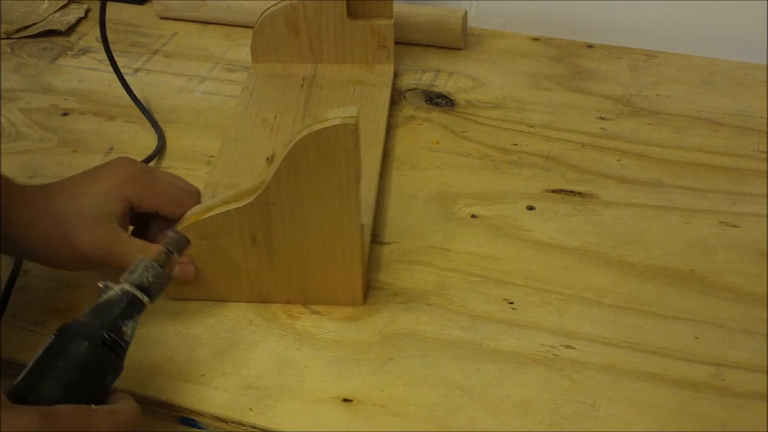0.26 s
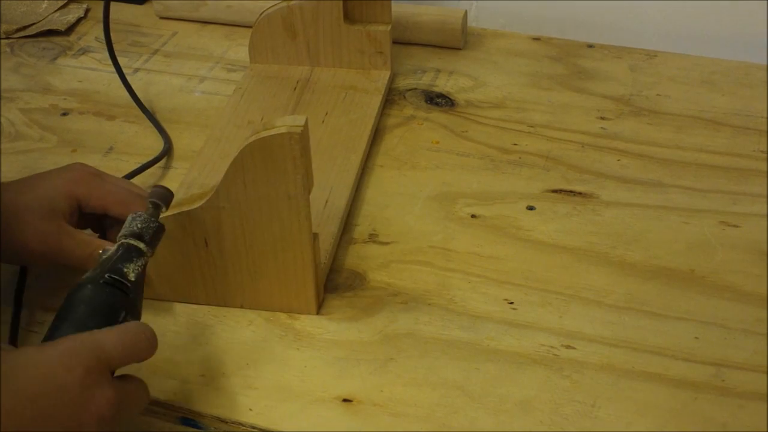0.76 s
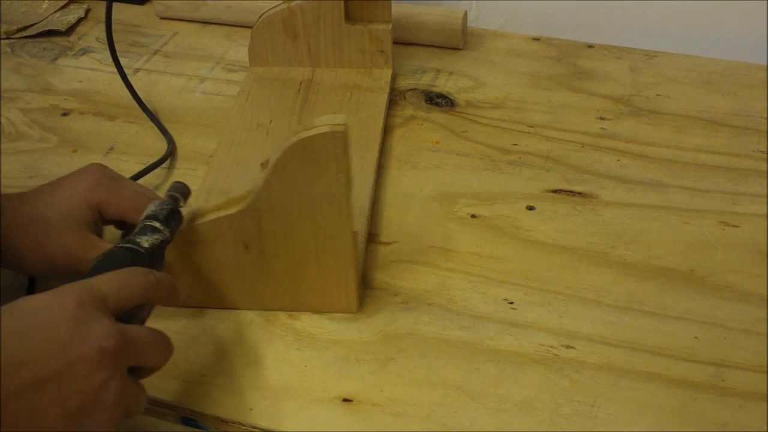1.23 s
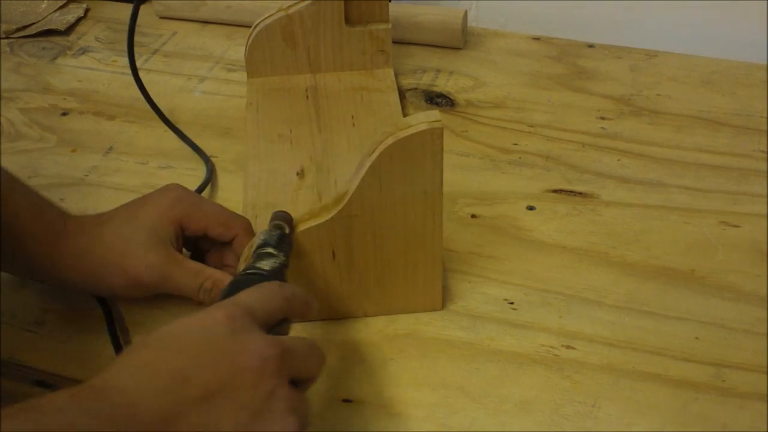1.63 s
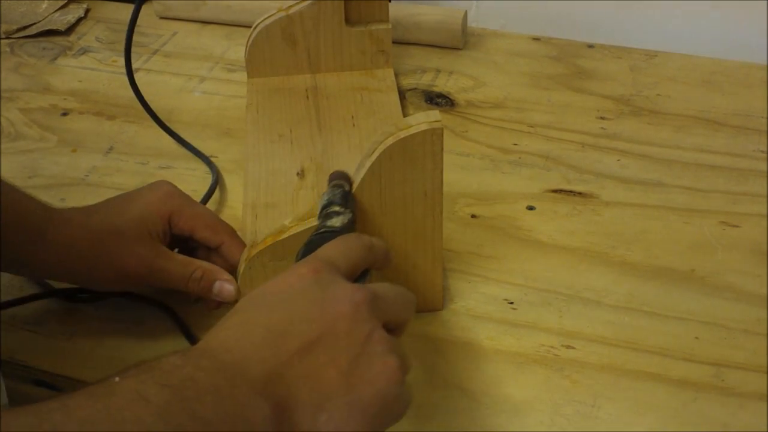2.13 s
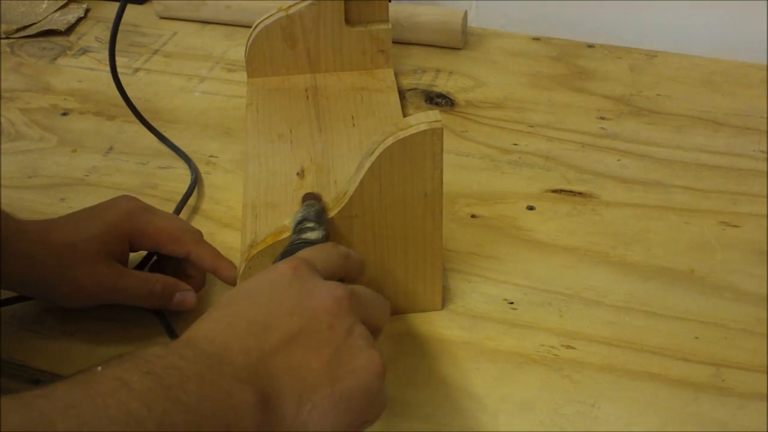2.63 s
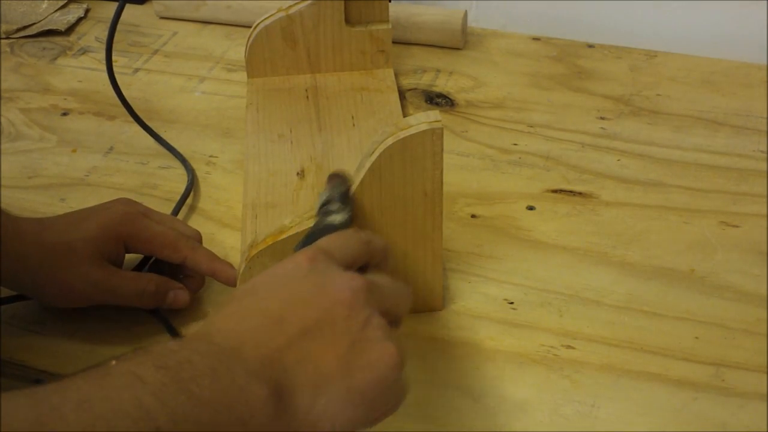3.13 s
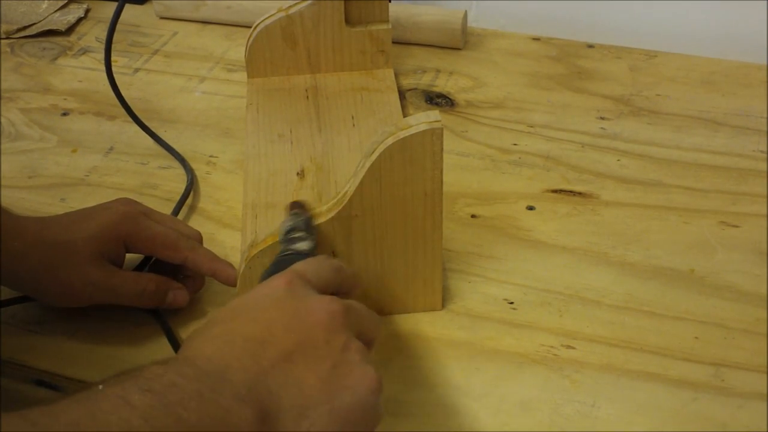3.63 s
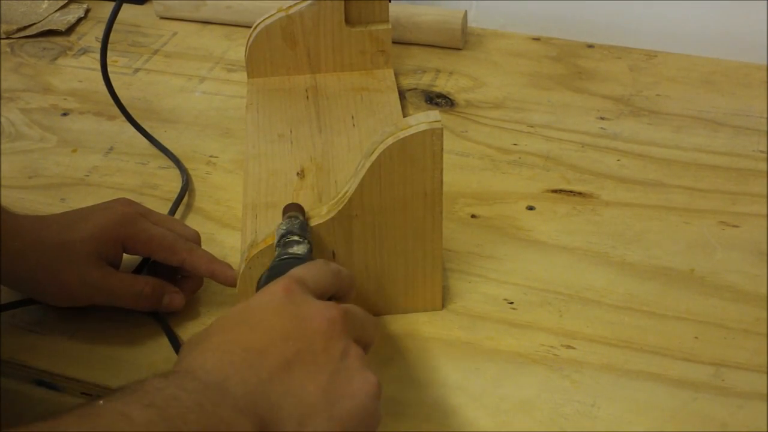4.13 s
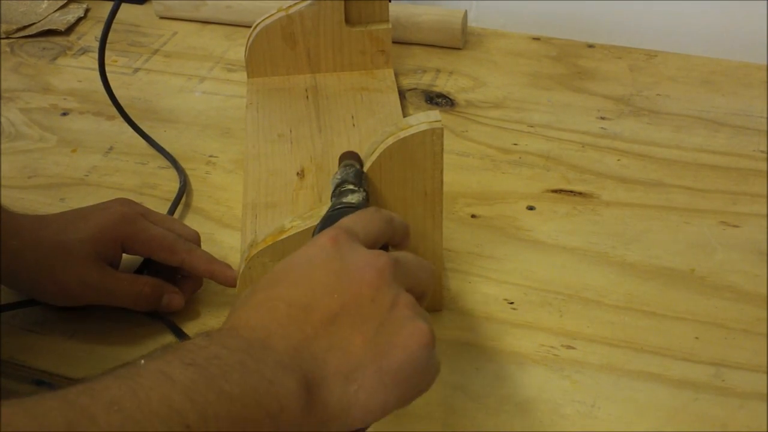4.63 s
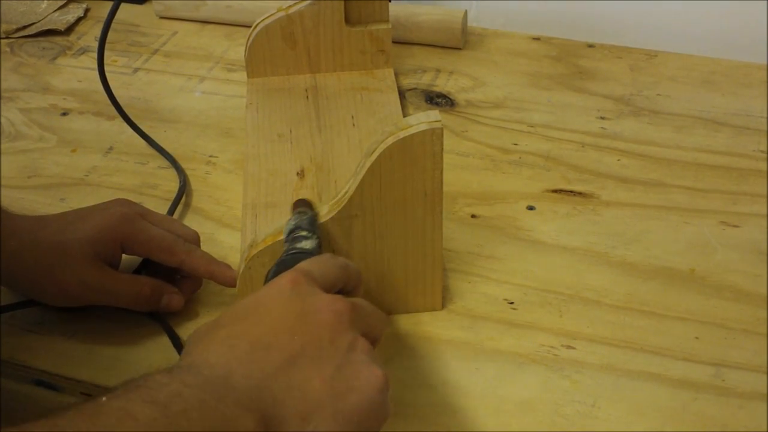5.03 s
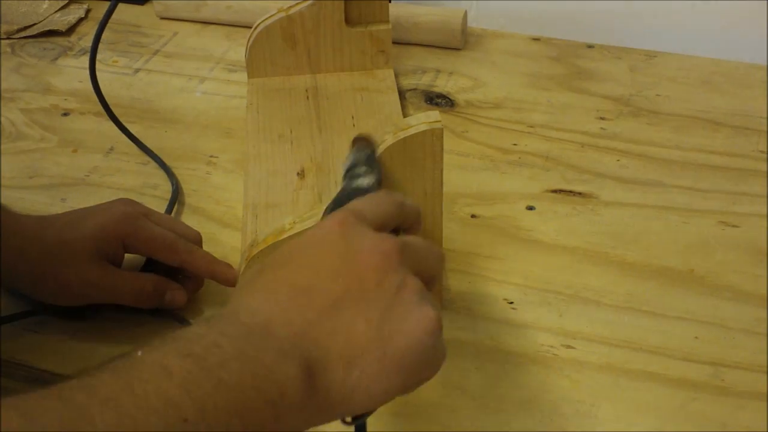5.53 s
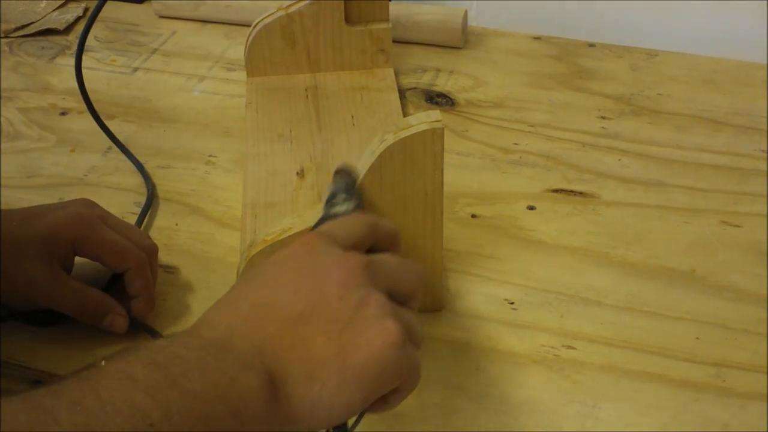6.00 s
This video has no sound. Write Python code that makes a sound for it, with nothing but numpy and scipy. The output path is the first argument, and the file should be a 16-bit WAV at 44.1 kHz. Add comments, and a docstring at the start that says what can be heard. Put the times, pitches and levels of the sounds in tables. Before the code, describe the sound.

In a quiet workshop, wood scuffs twice on a bench, then a small rotary tool whirs up and sands an edge, cutting off mid-run.

```python
"""A quiet workshop hums and a piece of wood slides twice; then a small rotary tool starts and spins up.
Its sanding drum is pressed along a wooden edge, and the sound stops abruptly with the tool still running.
Shaft, fan and ball bearings sing as sine tones at multiples of the shaft speed, which sags under load.
Rasp, cooling-air hiss, room tone and sliding are coloured noise; a sweeping growl marks the spin-up.
"""
import sys
import numpy as np
from scipy import signal
from scipy.io import wavfile
from scipy.ndimage import uniform_filter1d

SR = 44100
rng = np.random.default_rng(int(sys.argv[2]) if len(sys.argv) > 2 else 0)


def log_audio(samples):
    """Write samples as a 16-bit WAV file to the path given in sys.argv[1]."""
    # one column per channel
    frames = np.atleast_2d(samples).T
    # limit to full scale, then quantise
    limited = np.clip(frames, -1, 1)
    pcm = np.round(limited * 32767).astype(np.int16)
    wavfile.write(sys.argv[1], SR, pcm)


N = 276093
T = np.arange(N) / SR  # time of every sample [s]
ON_S = 0.685  # the tool is switched on

# Colour of the hiss from brushes and cooling air: (frequency [Hz], level [dB per Hz])
HISS_COLOUR = [(1760, -27.5), (3000, -6.5), (4660, -6.5), (7110, -8.5), (7870, -3.5), (8480, -10),
               (10000, -2), (10800, -2), (13500, -3), (15200, -3)]
# Leading tones: (multiple of shaft speed); first: ball cage, 3.08: a companion just above the third multiple,
# other fractional: bearings, last: fan blades
LEADING_MULTIPLES = (.37, 1, 2, 3, 3.08, 3.81, 4, 5, 7, 7.25, 18)


def gain_of(db):
    """Turn decibels into an amplitude factor."""
    return 10 ** (np.asarray(db) / 20)


def evened(x):
    """Scale a signal to an rms (average strength) of 1."""
    return x / np.sqrt(np.mean(x ** 2) + 1e-20)


def wander(top_hz, count=24):
    """Slow irregular drift of rms 1: a sum of sines with rates up to top_hz, slower ones stronger."""
    hz = np.geomspace(top_hz / 12, top_hz, count)[:, None]
    coarse = T[::128]  # slow changes need few points
    waves = np.sin(2 * np.pi * (hz * coarse + rng.random((count, 1)))) / np.sqrt(hz)
    return np.interp(T, coarse, evened(waves.sum(0)))


def noise(colour, patchy_db):
    """Noise of rms 1 from random short-time spectra of a given colour, with drifting louder patches."""
    hz = np.fft.rfftfreq(1024, 1 / SR)
    colour_hz, colour_db = np.transpose(colour)
    real, imaginary, patches = rng.standard_normal((N // 256 + 5, 513, 3)).T
    patches = uniform_filter1d(patches, size=10, axis=0)  # smooth over frequency
    patches = evened(uniform_filter1d(patches, size=12, axis=1))  # and over time
    db = np.interp(np.log(hz + 1), np.log(colour_hz + 1), colour_db)[:, None]
    spectra = (real + 1j * imaginary) * gain_of(db + patchy_db * patches)
    _, wave = signal.istft(spectra, nperseg=1024, noverlap=768)
    return evened(wave[:N])


def bump(middle_s, length_s):
    """A rounded rise and fall from 0 to 1 and back."""
    phase = np.pi * np.clip((T - middle_s) / length_s, -.5, .5)
    return np.cos(phase).clip(0) ** 1.49


def room_tone():
    """The quiet workshop: soft coloured noise and a few steady hums of wandering level."""
    # Colour of the room noise: (frequency [Hz], level [dB per Hz])
    room_colour = [(18, -56), (30, -35.5), (64, -22), (100, -26), (125, -24), (250, -11.5), (700, -8),
                   (1200, -16), (1700, -23.5), (2500, -28.5), (6000, -33.5), (10000, -33.5), (13000, -30.5),
                   (15200, -35.5)]
    # Steady tones in the room: (frequency [Hz], rms level before wandering [dB])
    hum_tones = [(121, -62.5), (140, -62.5), (210, -60), (242, -56.5), (533, -50)]
    air = gain_of(-41.5) * noise(room_colour, patchy_db=.8)
    hum = sum(gain_of(db + 3. * wander(top_hz=6.)) * np.sin(2 * np.pi * hz * T) for hz, db in hum_tones)
    return air + np.sqrt(2) * hum  # a sine of rms 1 peaks at the root of 2


def bench_slides():
    """The piece of wood slides on the bench: short, unsteady strokes of coloured friction noise."""
    # Colour of the sliding: (frequency [Hz], level [dB per Hz])
    slide_colour = [(35, -29.5), (70, -12.5), (230, -7.5), (400, 0), (600, -14.5), (1000, -5), (2000, -19),
                    (3000, -22), (5000, -29.5), (8000, -48), (12000, -81)]
    # Each slide: (start [s], time until the fade [s], level [dB])
    slide_times = [(0.397, .1, -34), (0.589, 0.07, -37.5)]
    rise_s, fade_s = .04, .05
    push = np.zeros(N)
    for start, length, db in slide_times:
        rise = np.clip((T - start) / rise_s, 0, 1)
        fade = np.exp(-np.maximum(T - start - length, 0) / fade_s)
        push += gain_of(db) * rise * fade
    return push * gain_of(0.83 * wander(top_hz=88.0)) * noise(slide_colour, patchy_db=.8)


def shaft_hz():
    """Shaft speed: it nears its free speed in a quick and a slow step, less what the load takes."""
    # The load on the drum slows the shaft: (time [s], speed lost [Hz])
    sag = [(1.9, 0.1), (2.075, 1.57), (2.15, 11.9), (2.45, 26.5), (2.6, 46), (2.7, 54), (2.97, 59.5),
           (3.05, 53.3), (3.15, 62.2), (3.42, 73.4), (3.53, 62.6), (3.58, 67), (3.64, 82), (3.75, 78.6),
           (4.03, 75), (4.11, 70), (4.18, 70), (4.26, 82), (4.4, 91), (4.7, 78), (4.93, 64.3), (5.08, 66),
           (5.3, 78), (5.41, 89.7), (5.59, 81)]
    free_hz, slow_share, quick_s, slow_s = 489.9, .66, .035, .36
    on = np.maximum(T - ON_S, 0)
    missing = slow_share * np.exp(-on / slow_s) + (1 - slow_share) * np.exp(-on / quick_s)
    return free_hz * (1 - missing) - np.interp(T, *np.transpose(sag))


def rasp_and_hiss(rasp_db, hiss_db, turns, load, chatter_db):
    """Motor body and abrasive rasp on wood; brushes and cooling air hiss; both pulse with each turn."""
    # Colour of the rasp: (frequency [Hz], level [dB per Hz])
    rasp_colour = [(18, -71), (30, -41.5), (135, -21.5), (288, -20.5), (420, -7), (469, -10.5), (612, -10),
                   (834, -0.5), (1240, 0.5), (1450, -4.5), (1700, 0), (6000, -16.5), (7800, -34.5),
                   (13200, -120)]
    bite = np.cos(2 * np.pi * turns)  # the off-centre drum bites once a turn
    rasp = gain_of(rasp_db + 0.86 * chatter_db) * (1 + 0.13 * load * bite) * noise(rasp_colour, patchy_db=0.54)
    hiss = gain_of(hiss_db + 1.4 * chatter_db) * (1 + 0.053 * bite) * noise(HISS_COLOUR, patchy_db=2.5)
    rise = np.clip((T - ON_S) / 0.04, 0, 1) ** 1.9  # both come up within 0.04 s
    return (rasp + hiss) * rise


def fine_whine(turns):
    """The ball cage, slower than the shaft, puts a faint wavering line either side of high multiples."""
    hz, db = np.transpose(HISS_COLOUR)
    mean_hz = turns[-1] / T[-1]
    orders = np.arange(11, 38)
    cage = LEADING_MULTIPLES[0]
    multiples = np.concatenate([orders - cage, orders + cage])
    multiples = multiples + rng.uniform(-.1, .1, 2 * len(orders))
    whine = np.zeros(N)
    for multiple in multiples:
        level_db = np.interp(multiple * mean_hz, hz, db) + 5.2 * wander(top_hz=18., count=10)
        whine += gain_of(level_db) * np.sin(2 * np.pi * (multiple * turns + rng.random()))
    return whine


def weaker_tones(turns, load, chatter_db):
    """Shaft, fan, drum and bearings sing at multiples of the speed, each tone wavering on its own."""
    # Weaker tones: (multiple of shaft speed); whole: shaft, fan and drum, fractional: bearings
    weak_multiples = [5.14, 5.43, 6, 6.51, 8, 9, 10, 10.28, 10.71, 11, 12, 13, 13.4, 14, 14.14, 15, 15.4,
                      16, 16.85, 17.58, 20, 20.3, 21, 21.39, 22, 23.1, 23.69, 24.52, 25.65, 27.2, 27.93,
                      28.23, 34.76]
    # One row a weaker tone: (level running free [dB], level sanding [dB]), before spin-up quieting
    weak_levels = [(-38, -46), (-29, -66.5), (-41.5, -31), (-28, -37), (-30, -35), (-47.5, -42.5),
                   (-31, -34), (-39, -50), (-32.5, -45.5), (-37.5, -40), (-55.5, -40.5), (-60, -46),
                   (-30, -52), (-46, -55), (-36, -40.5), (-65, -52.5), (-43.5, -41), (-57, -44.5),
                   (-43, -51), (-32, -37.5), (-57.5, -44.5), (-37, -43.5), (-45.5, -52), (-28, -55.5),
                   (-52, -56), (-47, -42), (-29.5, -38), (-30, -60.5), (-64, -42), (-42, -50.5),
                   (-32.5, -43), (-49, -40.5), (-59, -42.5)]
    tones = np.zeros(N)
    for multiple, (free_db, sanding_db) in zip(weak_multiples, weak_levels):
        db = free_db + load * (sanding_db - free_db) + chatter_db
        db = db + 3.77 * wander(top_hz=26.16, count=12)
        tones += gain_of(db) * np.sin(2 * np.pi * (multiple * turns + rng.random()))
    return tones


def growl():
    """As the motor gathers speed a tone sweeps up, roughened into a band by fast uneven throbbing."""
    # Path of the sweep: (time [s], frequency [Hz], level before throbbing [dB])
    sweep = [(0.737, 1614, -47), (.78, 1850, -30), (.81, 2050, -31), (.85, 2240, -21), (0.901, 2433, -21),
             (.95, 2610, -31), (0.989, 2750, -50.5)]
    s, hz, db = np.transpose(sweep)
    throb = evened(uniform_filter1d(rng.standard_normal(N), size=120))
    level = gain_of(np.interp(T, s, db, left=-120, right=-120)) * (.6 + .8 * throb)
    return level * np.sin(2 * np.pi * np.cumsum(np.interp(T, s, hz)) / SR)


def leading_tones(turns, load, chatter_db, settling_db):
    """The strongest multiples of the speed; now and then one or another swells for a while."""
    # One row a leading tone: (level running free [dB], level sanding [dB]), before spin-up quieting
    leading_levels = [(-73.5, -52.5), (-43, -31), (-42, -30.5), (-27, -21.5), (-28, -34.5), (-46.5, -38.5),
                      (-51, -31), (-44.5, -29.5), (-47, -32.5), (-33.5, -37), (-41.5, -40)]
    # One list of swells a leading tone: (middle [s], length [s], peak level before flutter [dB])
    swell_lists = [
        [(2.6, 0.5, -42), (3.85, 0.36, -43.5), (5.15, 0.8, -46.5)],
        [(1.05, 0.7, -44), (2.1, 0.67, -34.5), (3.42, .15, -27.5), (3.62, 0.076, -21.5), (3.85, 0.48, -26.5),
         (4.21, .15, -22), (4.32, .12, -31), (4.73, 0.31, -24.5), (5.03, 0.17, -28), (5.28, 0.44, -25),
         (5.57, 0.17, -25)],
        [(1.35, 0.49, -33.5), (2.03, 0.21, -17.5), (2.23, 0.19, -22), (2.47, 0.46, -23), (2.82, .25, -27.5),
         (3.07, 0.1, -22.5), (3.3, 0.33, -23.5), (3.55, 0.14, -26), (4.17, 0.13, -24), (4.76, 0.23, -23),
         (4.97, 0.14, -19), (5.12, 0.27, -25)],
        [(.81, .1, -35), (.97, 0.3, -28.5), (1.28, 0.2, -25.5), (1.75, 0.35, -24), (2.25, 0.14, -19),
         (2.86, 0.23, -16.5), (3.08, 0.28, -17.5), (3.27, 0.3, -16.5), (3.57, .15, -12.5), (3.78, 0.16, -15.5),
         (4.17, 0.27, -14.5), (4.4, 0.18, -23.5), (4.7, .2, -20), (4.95, .15, -19), (5.07, 0.13, -16),
         (5.22, 0.36, -14.5), (5.43, .2, -27)],
        [(1.744, 0.63, -26.5)],
        [(1.13, 0.18, -27), (1.32, 0.7, -29), (1.6, 0.24, -28), (2.38, 0.32, -26), (2.72, .2, -22),
         (2.88, 0.17, -23), (4.55, .3, -31), (5.38, .3, -27.5)],
        [(2.35, 0.33, -25.5), (2.67, .2, -26.5), (2.9, .2, -24), (3.9, 0.41, -24), (4.28, 0.22, -20.5),
         (5.3, 0.31, -24.5), (5.5, .15, -23)],
        [(2.5, 0.45, -21), (2.85, 0.41, -23), (3.1, .1, -23.5), (3.3, 0.14, -25), (3.57, 0.12, -24),
         (3.85, .2, -30), (4.2, 0.21, -23), (4.42, 0.37, -25.5), (5.1, 0.31, -22.5), (5.4, 0.22, -24)],
        [(2.68, .12, -25.5), (3.27, 0.11, -32), (3.57, 0.11, -24.5), (3.75, 0.13, -28.5), (3.95, 0.19, -25),
         (4.32, 0.29, -23.5), (4.62, 0.1, -21.5), (5.03, 0.2, -25)],
        [(1.6, 0.52, -25), (2.0, 0.22, -24), (2.2, 0.18, -25), (2.4, 0.24, -24.5), (3.75, 0.37, -30.5),
         (4.6, 0.23, -25), (4.95, 0.19, -27), (5.3, 0.23, -27.5)],
        [(2.2, 0.85, -29.5)],
    ]
    tones = np.zeros(N)
    for multiple, (free_db, sanding_db), swells in zip(LEADING_MULTIPLES, leading_levels, swell_lists):
        db = free_db + load * (sanding_db - free_db) + settling_db
        level = gain_of(db + 3.38 * wander(top_hz=24.957, count=12))
        swell = sum(gain_of(peak_db) * bump(middle, length) for middle, length, peak_db in swells)
        level = np.maximum(level, swell)  # the louder of the two is heard
        flutter = gain_of(chatter_db + 2.1 * wander(top_hz=110.1))
        tones += level * flutter * np.sin(2 * np.pi * multiple * turns)
    return tones


def tool():
    """The rotary tool: one turning shaft drives all its tones but the growl, heard over rasp and hiss."""
    # Noise levels before surge and chatter: (time [s], rasp level [dB], air hiss level [dB])
    noise_levels = [(.8, -23, -15.5), (.9, -28.5, -14.5), (1.2, -26, -16.5), (1.55, -22.5, -17.5),
                    (1.95, -21, -20.5), (2.2, -21, -19), (2.6, -23, -21.5), (2.95, -24, -21.5),
                    (3.06, -19, -19.5), (3.18, -25.5, -25), (3.55, -23.5, -21), (3.65, -28.5, -29),
                    (3.82, -21.5, -23.5), (3.95, -22.5, -18), (4.131, -21, -19), (4.35, -24.5, -25.5),
                    (4.621, -22, -20), (5.0, -22.5, -18), (5.1, -24, -23.5), (5.59, -23, -24)]
    # Most tones are buried until the speed settles: (time [s], level change [dB])
    spin_up = [(.75, -14.5), (1.0, -10), (1.3, -9.5), (1.8, -2.5)]
    s, rasp_db, hiss_db = np.transpose(noise_levels)
    # the starting current shakes the motor briefly
    surge_db = 5 * np.exp(-((T - 0.766) / 0.027) ** 2)
    rasp_db = np.interp(T, s, rasp_db) + surge_db
    hiss_db = np.interp(T, s, hiss_db) + surge_db
    unsteady = 1 + 0.0013 * wander(top_hz=40.0)
    turns = np.cumsum(shaft_hz() * unsteady) / SR  # turns made so far
    load = np.interp(T, (2.0, 2.4), (0, 1))  # the drum settles onto the wood from 2.0 to 2.4 s
    chatter_db = .8 * load * wander(top_hz=90.8)  # the drum skips on the grain
    settling_db = np.interp(T, *np.transpose(spin_up))

    whine = gain_of(hiss_db - 17.5) * fine_whine(turns)  # follows the hiss level
    weak = whine + weaker_tones(turns, load, chatter_db)
    tones = weak * gain_of(settling_db) + growl()
    tones += leading_tones(turns, load, chatter_db, settling_db)
    tones *= np.clip((T - .71) / .06, 0, 1)  # tones emerge once the rotor is moving
    return np.sqrt(2) * tones + rasp_and_hiss(rasp_db, hiss_db, turns, load, chatter_db)


def walls(x, t60):
    """Sparse reflections of random sign, dying away by 60 dB in t60 seconds; cut at half a second."""
    at = np.arange(300, SR // 2, 20)  # one reflection in every 20 samples
    taps = np.zeros(SR // 2 + 20)
    signs = rng.choice([-1., 1.], len(at))
    taps[at + rng.integers(0, 20, len(at))] = signs * gain_of(-60 * at / SR / t60)
    return signal.fftconvolve(x, taps / np.linalg.norm(taps))[:N]


def scene():
    """The tool with its reflections, over the room and the sliding wood."""
    room = room_tone() + bench_slides()
    near = tool()
    echo = gain_of(-11) * walls(near, t60=.4)
    return (near + echo + room)[None]


def record(dry):
    """Soft overload, bass loss, narrow treble dips, the abrupt stop, then the treble limit."""
    # Narrow dips in the treble: (frequency [Hz], width of one pass [Hz], times applied)
    treble_dips = [(7890, 500, 3), (10960, 300, 1)]
    stop_s, edge_hz = 5.5845, 15310
    dry = 1.3 * np.tanh(dry / 1.3)  # loud peaks are rounded off
    dry = signal.lfilter(*signal.butter(2, 45, "high", fs=SR), dry)  # the deep bass is weakened
    for hz, width, times in treble_dips:
        for _ in range(times):
            dry = signal.lfilter(*signal.iirnotch(hz, hz / width, SR), dry)
    limit = signal.firwin(1023, edge_hz, window=("kaiser", 9), fs=SR)
    return signal.oaconvolve(dry * (T < stop_s), limit[None], "same")


dry = scene()
out = record(dry)
log_audio(out)
```